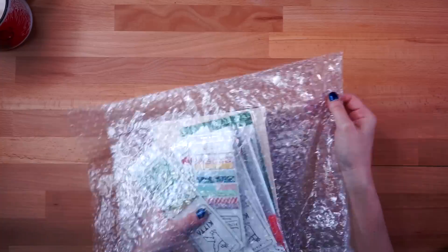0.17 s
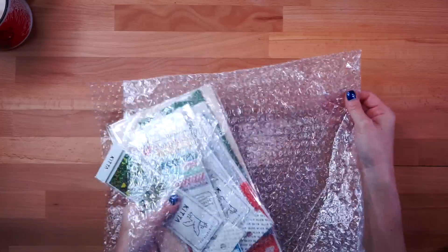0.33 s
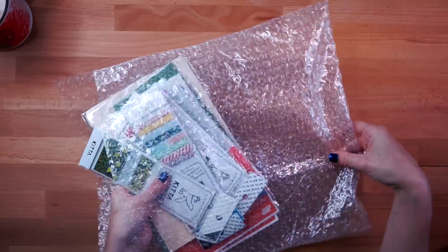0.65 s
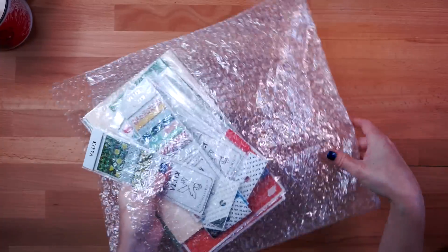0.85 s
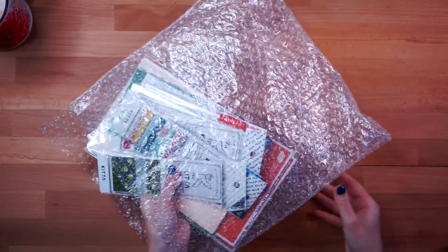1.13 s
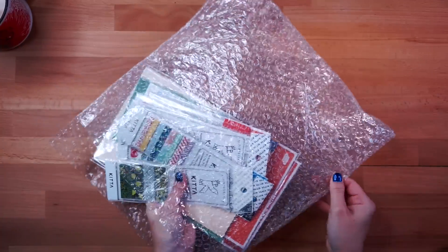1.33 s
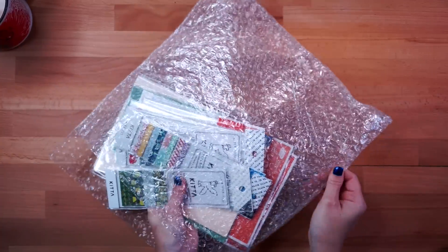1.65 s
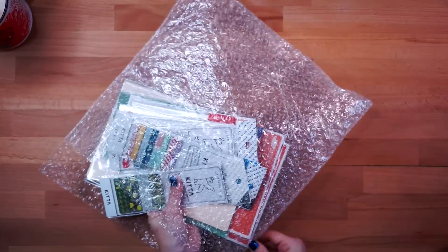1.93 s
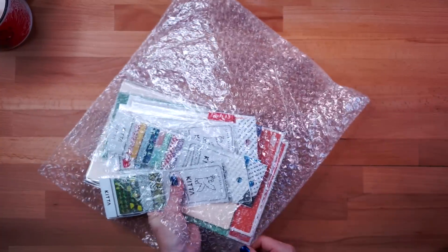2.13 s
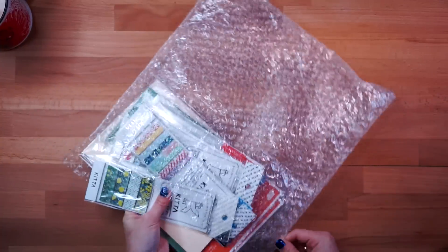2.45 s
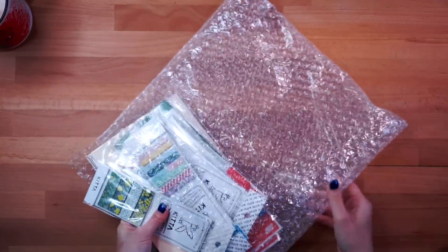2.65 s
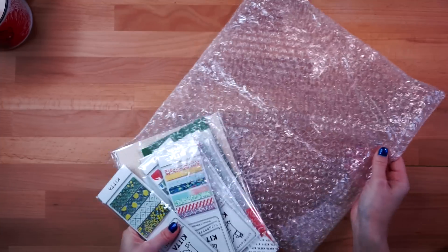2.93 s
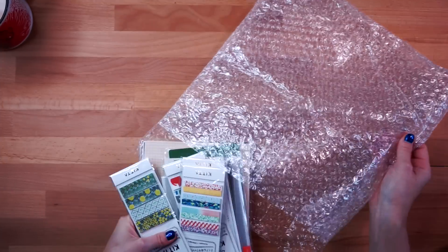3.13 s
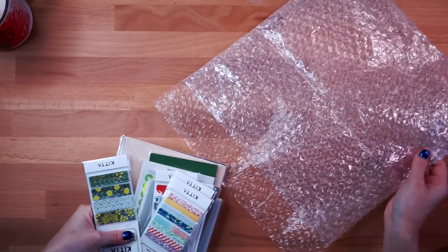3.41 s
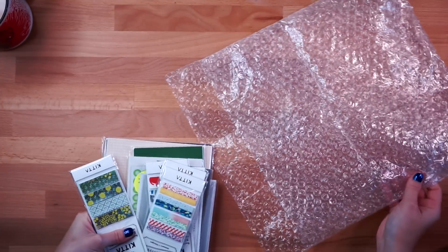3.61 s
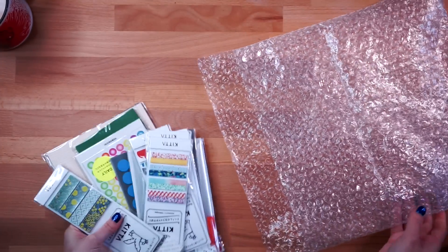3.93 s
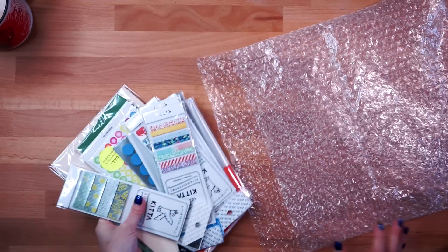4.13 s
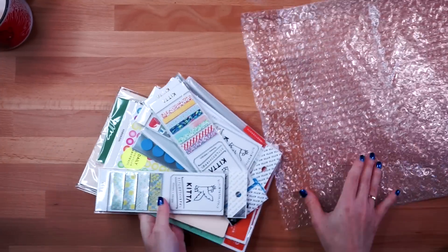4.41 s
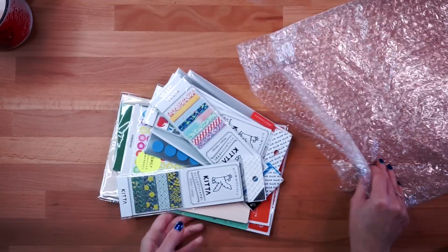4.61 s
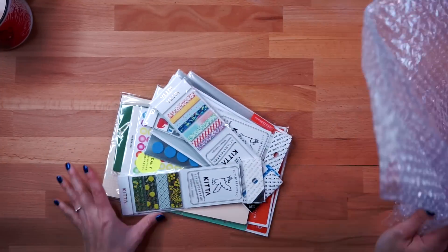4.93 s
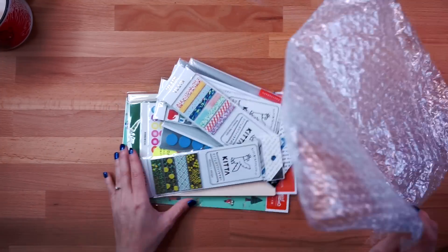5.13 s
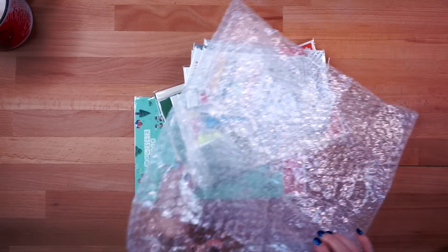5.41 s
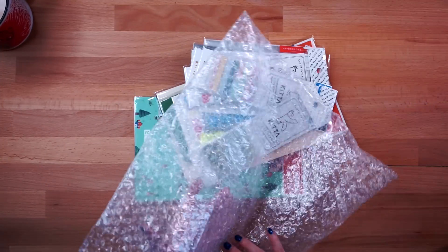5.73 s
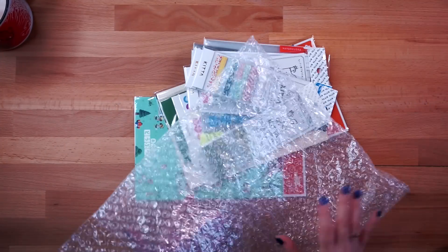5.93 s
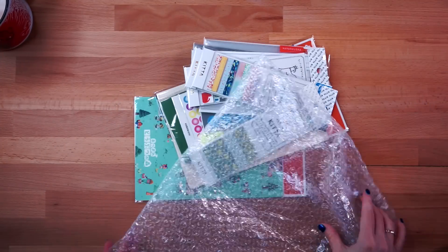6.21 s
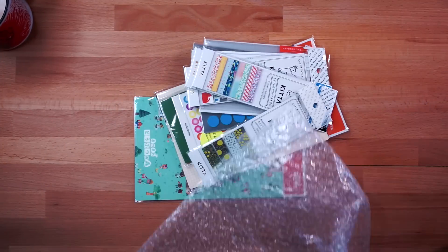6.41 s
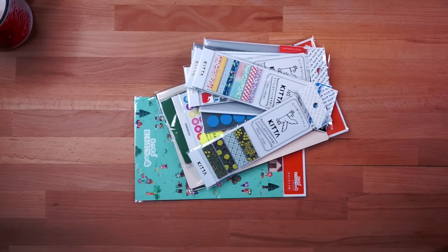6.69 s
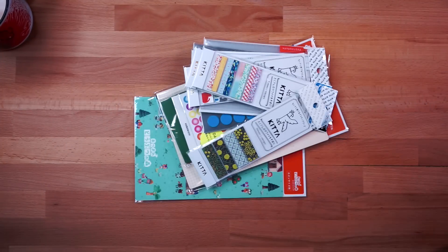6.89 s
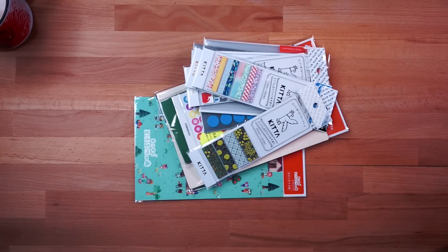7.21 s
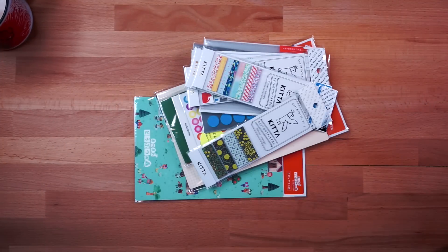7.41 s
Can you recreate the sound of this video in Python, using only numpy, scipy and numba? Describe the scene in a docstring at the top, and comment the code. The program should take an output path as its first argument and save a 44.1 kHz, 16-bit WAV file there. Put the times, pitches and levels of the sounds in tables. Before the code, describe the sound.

Hands pull a stack of plastic sleeves from a bubble-wrap bag on a wooden desk. Dense bright crackling with sharp snaps and low desk bumps comes first, eases into lighter crinkles, then surges again. Sleeves swish briefly, soft thuds follow, and the wrap drags off in a smoother rustle. Close microphone, small room, faint hiss.

```python
"""Hands pull a stack of plastic sleeves out of a bubble-wrap bag, lay it on a wooden desk and drag the bag away.
Throughout, the film buckles in countless short decaying sines of four sizes, some loud enough to snap alone.
Shoves make the desk top rumble as filtered noise; soft swings knock on it as the stack is laid down.
Then sleeves swish over each other as filtered clicks, more knocks follow, and dragging ends in a rustle.
A small room smears the film's sound by convolution; a deep building rumble and faint hiss lie under it all."""
import sys
import numpy as np
from scipy import signal
from scipy.fft import rfft, irfft
from scipy.io import wavfile
from scipy.ndimage import uniform_filter1d
from numba import njit

SR = 44100
rng = np.random.default_rng(int(sys.argv[2]) if len(sys.argv) > 2 else 0)


def generate_wav(signal):
    """Clip the signal to [-1, 1] and save it as 16-bit WAV at the path in sys.argv[1]."""
    frames = np.transpose(np.atleast_2d(signal))
    scaled = np.clip(frames, -1, 1) * 32767
    pcm = np.round(scaled).astype(np.int16)
    wavfile.write(sys.argv[1], SR, pcm)


N = 332955


def undb(db):
    """Level law: 20 dB is a factor of ten in amplitude."""
    return 10 ** (np.asarray(db) / 20)


def unit(x):
    """Normalisation to an RMS amplitude of 1."""
    return x / np.sqrt(np.mean(x ** 2))


def curves(table):
    """Linear interpolation: columns of a table joined by straight lines, one value a sample."""
    time_s, *columns = np.transpose(table)
    return [np.interp(np.arange(N) / SR, time_s, column) for column in columns]


def band(x, lo_hz, hi_hz, order=2):
    """Band-pass filtering with a Butterworth response."""
    edges_hz = [lo_hz, min(hi_hz, .45 * SR)]
    return signal.sosfilt(signal.butter(order, edges_hz, "bandpass", fs=SR, output="sos"), x)


def walk(rate_hz):
    """Random modulation: levels held for 1 / rate_hz and slewed from one to the next; spread 1."""
    hold = int(SR / rate_hz)
    steps = np.repeat(rng.standard_normal(N // 40), hold)[:N]
    slewed = uniform_filter1d(steps, hold)
    return slewed / slewed.std()


def swells(at, rise, hold, fall, levels_db, rest_db):
    """Incoherent summation: rows that rise, hold and fall add in power; one dB curve a column of levels."""
    t = np.arange(0, N + 64, 64)[:, None] / SR
    away = np.maximum(0, np.maximum((at - t) / rise, (t - at - hold) / fall))
    # one rise or fall time away from full strength is 20 dB down
    power = undb(-40 * away) @ undb(2 * levels_db) + undb(2 * rest_db)
    return [np.interp(np.arange(N) / SR, t[:, 0], curve) for curve in 10 * np.log10(power.T)]


# moves of the hands: full_strength_s, rise_s, hold_s, fall_s (rise and fall span 20 dB), crease_level_db,
# then relative to the creases: flexing_db, folds_db, ticks_db
HAND_MOVES = [(0.053, 0.26, .05, 0.23, -45.5, 5.5, 2, -2.5), (0.123, .05, .005, .1, -42, 0, 4, -5),
              (0.214, 0.18, 0.014, 0.19, -40, 7, 5, 0), (0.387, 0.35, 0.025, 0.13, -44.5, 3.5, 3.5, -1.5),
              (0.647, .12, 0.037, 0.22, -43, 4, -1.5, -1), (0.856, .04, .01, 0.28, -48.5, 4, -3, 1.5),
              (1.006, 0.032, 0.0087, 0.034, -43, 5.5, 0, -7), (1.279, 0.043, 0.12, 0.059, -46, 8, 0.5, -1),
              (1.485, .04, .005, .09, -49.5, 0, -4, -3), (1.556, .08, .005, 0.11, -52.5, 2.5, -4, -3),
              (1.63, 0.09, 0.037, .15, -54, -13, -17, 1.5), (1.728, 0.11, .005, 0.17, -50, 3, -16, -5),
              (1.836, 0.14, 0.028, .1, -58, 1.5, 3.5, -4), (1.945, 0.32, 0.043, 0.18, -63, -16, -3, -6),
              (2.099, 0.04, 0.0057, .2, -59.5, 4.5, 1, 2), (2.166, 0.094, .005, .08, -57.5, 5, -9, 3),
              (2.261, 0.054, 0.14, 0.2, -42.5, 3, -1.5, -.6), (2.822, 0.22, .005, 0.097, -41, 4, -2.5, -3),
              (2.996, 0.45, 0.26, 0.32, -50.5, 1.5, 2, -3), (3.36, 0.08, .005, 0.22, -53, -16, -10, 4),
              (3.5, 0.27, 0.19, 0.05, -57.5, -3, -1, 0), (3.736, 0.016, 0.004, 0.07, -49, 2.5, 0, 1),
              (3.873, 0.22, .005, .5, -46, -17, 2.5, -8), (4.173, 0.24, .005, 0.2, -50, 0, -1, -0.5),
              (4.32, 0.31, 0.062, .2, -56, -2, 1, -7), (4.558, 0.37, 0.091, 0.47, -44, -0.5, -5.5, -6),
              (4.784, 0.13, 0.12, .15, -48.5, 4, -1, -2), (4.96, .12, 0.039, .04, -50, 2, -4, -1.5),
              (5.018, .01, .013, .02, -46.5, -2, 2.5, -5), (5.093, .05, 0.084, 0.12, -64, 1, 6.5, -7),
              (5.245, 0.23, 0.22, 0.35, -59, -25, -11, -2), (5.32, .1, .005, .1, -66.5, 14.5, -5, 3),
              (5.507, 0.019, .005, 0.063, -44.5, 10.5, -1.5, 4),
              (5.559, 0.093, 0.21, 0.22, -47.5, 1.5, 1.5, -1),
              (5.864, 0.056, .005, 0.049, -47, 5.5, -2, -4),
              (5.927, 0.19, .03, 0.1, -45.5, -36, -10.5, -1.5),
              (6.079, .03, 0.024, 0.058, -39, 0.5, -4.5, -7), (6.176, 0.055, .005, 0.65, -48.5, -2.5, 0, 0),
              (6.338, 0.4, .005, 0.66, -43, -7.5, -2.5, -7.5),
              (6.577, 0.093, .14, 0.29, -38.5, -5.5, -2, -5), (6.796, .3, 0.043, 0.23, -45, 8.5, 2.5, -7),
              (7.009, .02, 0.051, 0.22, -45, 5.5, 0.5, -7), (7.16, 0.24, 0.036, 0.16, -55, 1, 3, -0.5),
              (7.306, .2, .005, 0.036, -62, 11.5, 9, -3), (7.347, 0.61, 0.026, 1, -55.5, -36, -10, -3)]
# the film settles between moves: creases_db, flexing_db, folds_db, ticks_db
SETTLING_DB = (-67.5, -90, -82, -72)


def handling():
    """Forced excitation: the hands set the crease level and, against it, flexing, folds and ticks, in dB."""
    moves = np.array(HAND_MOVES)
    levels_db = moves[:, 4:5] + np.c_[0 * moves[:, 0], moves[:, 5:]]
    crease, *others = swells(*moves[:, :4].T, levels_db, np.array(SETTLING_DB))
    return [crease] + [other - crease for other in others]


@njit
def rings(at, hz, cycles, size, length):
    """Damped free vibration: each buckle is a sine that dies by 1/e in a quarter of its cycles."""
    out = np.zeros(length)
    for g in range(len(at)):
        turn = np.exp((2j * np.pi - 4 / cycles) * hz[g] / SR)
        state = size[g] + 0j
        start = int(at[g] * SR)
        stop = int((at[g] + 1.5 * cycles / hz[g]) * SR) + 2
        for i in range(start, min(length, stop)):
            out[i] += state.imag
            state *= turn
    return out


# sizes of buckle, large to small (flexing, folds, creases, ticks):
# lowest_hz, highest_hz, ring_cycles, rate_per_s, size_scatter_db, level_db
BUCKLE_SIZES = [(443, 728, 3.06, 700, 2.5, -8), (1356, 1870, 2.33, 1700, 2.5, -6),
                (2455, 8300, 1.65, 5000, 2.5, -1.39), (6360, 12700, 2.12, 6000, 2, -2)]


def crinkle():
    """Poisson showers of buckles: jerks swell all sizes together, and each size also flickers alone."""
    crease, flex, fold, tick = handling()
    jerk_db = 0.82 * walk(28) + 0.7 * walk(170)
    out = 0
    for relative_db, buckle in zip((flex, fold, 0, tick), BUCKLE_SIZES):
        lo, hi, cycles, rate, scatter_db, level_db = buckle
        u = rng.random((60000, 4))
        at = np.cumsum(-np.log(1 - u[:, 0])) / rate
        keep = at < N / SR
        sign = np.sign(u[:, 1] - .5)
        size = sign * undb(-scatter_db * np.log(1 - u[:, 2]))
        hz = lo * (hi / lo) ** u[:, 3]
        shower = rings(at[keep], hz[keep], cycles, size[keep], N)
        # a buckle radiates little far below or above its own ring
        shower = unit(band(shower, 0.61 * lo, 1.27 * hi))
        flicker_db = 0.86 * walk(23)
        out = out + shower * undb(crease + relative_db + level_db + jerk_db + flicker_db)
    return out


# lone snaps: start_s, level_db (before the common snap gain), pitch_hz, slope_db_per_octave away from the pitch
LONE_SNAPS = [(.04, -30.5, 4500, 12), (.071, -33.5, 2500, 3), (.106, -22.5, 3000, 0.5), (.177, -35, 650, 4),
              (.2165, -18.5, 4000, 7), (.222, -33, 600, 5), (.249, -24.5, 1500, 10), (.264, -24, 1900, 4),
              (.346, -31, 900, 3), (.392, -29.5, 700, 6), (.563, -38.5, 6000, 7), (.66, -48, 1200, 1.2),
              (.705, -24.5, 1730, 14), (.758, -44, 4000, 1.6), (.79, -35, 4500, 6), (.856, -39.5, 700, 3),
              (.972, -33, 4500, 11), (.995, -41.5, 9000, 2), (1.015, -34, 2500, 6), (1.158, -39.5, 9000, 2),
              (1.269, -33.5, 560, 28), (1.282, -41, 900, 1.2), (1.301, -40, 560, 2),
              (1.332, -27.5, 9000, 8), (1.481, -27.5, 1870, 5.5), (1.512, -33.5, 9000, 9),
              (1.551, -36, 4500, 6), (1.595, -44, 2800, 4), (1.626, -21.5, 2000, 5),
              (1.853, -33.5, 6000, 6.5), (1.94, -50, 5000, 4), (1.967, -39.5, 9000, 8),
              (2.098, -46, 5000, 3.5), (2.164, -52, 560, 4), (2.209, -37, 9000, 14),
              (2.258, -32.5, 9000, 3), (2.274, -35, 600, 1.5), (2.285, -37, 5000, -1),
              (2.294, -33, 4500, 2.2), (2.345, -42, 8000, 6), (2.363, -40, 6000, 2), (2.621, -46, 3500, 11),
              (2.637, -39.5, 650, 7), (2.762, -38.5, 6000, 2), (2.801, -23.5, 4500, 4),
              (2.803, -34, 560, 8), (2.832, -37, 700, 1), (2.983, -42.5, 560, 0), (3.232, -26.5, 3200, 2),
              (3.273, -40, 1600, 2), (3.355, -23.5, 9000, 14), (3.509, -43.5, 7500, 3.5),
              (3.663, -30, 6950, 8.5), (3.737, -29, 6500, 6.5), (3.935, -28.5, 9000, 14),
              (4.174, -32, 4500, 12), (4.409, -43, 1500, 5), (4.445, -31, 5500, 10), (4.48, -34, 4500, 5),
              (4.628, -35.5, 3500, 3), (4.762, -45, 700, 1.5), (4.883, -38, 600, 3), (4.896, -39, 3200, 3),
              (4.984, -38, 597, 3), (5.016, -35.5, 2200, 1), (5.028, -29, 2000, 5),
              (5.047, -32.5, 800, 2.5), (5.105, -46, 554, 5), (5.118, -40, 2800, 4), (5.135, -42, 3500, 5),
              (5.163, -46.5, 890, 1), (5.507, -39, 1500, 3), (5.598, -40, 9000, 2.5),
              (5.783, -31.5, 3780, 8), (5.861, -44, 700, 1.2), (5.943, -45, 9000, 4),
              (6.063, -37.5, 2600, 0), (6.076, -39, 3200, 6), (6.251, -42, 3000, 4), (6.292, -40, 6000, 8),
              (6.479, -41, 560, 3), (6.515, -30.5, 9000, 4.5), (6.555, -36, 4000, 9), (6.676, -29, 2000, 6),
              (6.811, -28, 700, 3), (6.874, -29.5, 556, 9), (6.959, -39, 2800, 7.5), (7.004, -30, 900, 4)]


def lone_snaps():
    """Spectral envelope: each buckle size is weighted by the octaves between its ring and the snap's pitch."""
    at, level_db, pitch_hz, slope = np.transpose(LONE_SNAPS)
    middle_hz = np.sqrt([lo * hi for lo, hi, *_ in BUCKLE_SIZES])
    octaves = abs(np.log2(middle_hz / pitch_hz[:, None]))
    return np.c_[at, level_db, -slope[:, None] * octaves]


# small snaps: rate_per_s, size_range_db (either way), colour_scatter_db
SMALL_SNAP_STATISTICS = (70, 4.4, 1.3)
# crumpling snaps, dragging only rustles: time_s, small_snaps_over_creases_db (before the common snap gain)
CRUMPLING = [(0, 5.5), (1.0, 5), (2.2, 4.5), (3.0, 3.5), (3.75, 2.5), (3.85, 2), (4.3, -3.5), (4.5, 2.5),
             (5.9, 2), (6.15, -2.5), (6.6, -3.5), (7.55, -11)]


def small_snaps():
    """Poisson process: random small snaps, their level and colour led by the handling of the moment."""
    rate, size_range_db, colour_db = SMALL_SNAP_STATISTICS
    u = rng.random((2000, 2))
    v = rng.standard_normal((2000, 4))
    at = np.cumsum(-np.log(1 - u[:, 0])) / rate
    keep = at < N / SR
    moment = (at[keep] * SR).astype(int)
    controls = handling() + curves(CRUMPLING)
    crease, flex, fold, tick, over = (control[moment] for control in controls)
    level_db = crease + over + size_range_db * (2 * u[keep, 1] - 1)
    colours = np.c_[flex - 3.0, fold, 0 * fold, tick] + colour_db * np.tanh(v[keep])
    return np.c_[at[keep], level_db, colours]


SNAP_SPREAD_S, SNAP_GAIN_DB = .0008, 4  # mean scale of the random delays; gain common to all snaps


def snaps(table, count=5):
    """Avalanche: buckles of every size let go within a millisecond or two, the first ones strongest."""
    out = 0
    for k, (lo, hi, cycles, *_) in enumerate(BUCKLE_SIZES):
        u = rng.random((len(table), count, 2))
        late = -np.log(1 - u[..., 0])
        late -= late.min(axis=1, keepdims=True)
        size = undb(table[:, 1, None] + table[:, 2 + k, None] + SNAP_GAIN_DB) * np.exp(-.6 * late)
        # short rings need a higher peak to carry the same energy
        size = size * (-1) ** np.arange(count) * np.sqrt(lo / BUCKLE_SIZES[0][0])
        hz = lo * (hi / lo) ** ((np.arange(count) + u[..., 1]) / count)
        at = table[:, :1] + SNAP_SPREAD_S * late
        burst = rings(at.ravel(), hz.ravel(), 0.8 * cycles, size.ravel(), N)
        out = out + band(burst, 0.93 * lo, 1.23 * hi)
    return out


# sleeves slide over each other: time_s, level_db (before random wavering)
SLEEVE_SLIDE = [(3.78, -83), (3.86, -49), (3.95, -46), (4.1, -45.5), (4.19, -53), (4.3, -83)]
# air pockets between the sleeves: centre_hz, width_hz, relative_level_db
AIR_POCKETS = [(1540, 550, -20), (2020, 490, 3), (3750, 640, -4), (5160, 1700, 4), (7100, 990, -24)]


def slide():
    """Stick-slip friction: dense clicks, coloured by the resonance of the pockets of air."""
    clicks = rng.standard_normal(N) * undb(2.8 * rng.standard_normal(N))
    swish = 0
    for hz, width_hz, db in AIR_POCKETS:
        pocket = band(clicks, hz - width_hz / 2, hz + width_hz / 2, order=1)
        swish = swish + undb(db) * unit(pocket)
    return unit(swish) * undb(curves(SLEEVE_SLIDE)[0] + 1.4 * walk(30))


# close echoes off desk, stand and near walls: nominal_delay_s, level_db (both relative to the direct sound)
CLOSE_ECHOES = [(.0011, -9), (.0025, -8), (.0082, -10), (0.015, -26)]
# decay of the room's tail by band: centre_hz, t60_s, relative_level_db
ROOM_DECAY = [(480, 0.25, -5), (1730, 0.43, -5), (5960, 0.36, -0.5), (13000, 0.12, 1.5)]
ROOM_DB = -6.5  # energy of the tail against the direct sound


def room(x, size=1024):
    """Reverberation by convolution: direct sound, close echoes and a tail with its own decay in each band."""
    span, count = 16 * size, N // size + 2
    t = np.arange(span - 2 * size) / SR
    # the film moves, so each moment has new paths
    noise = rng.standard_normal((count, len(t)))
    paths = 0
    for hz, t60, db in ROOM_DECAY:
        paths = paths + band(noise, hz / 2, hz * 1.6, order=1) * undb(db - 60 * t / t60)
    paths *= np.clip(t / 0.019, 0, 1)
    paths *= undb(ROOM_DB) / np.sqrt(np.mean(np.sum(paths ** 2, axis=1)))
    paths[:, 0] = 1
    for delay_s, db in CLOSE_ECHOES:
        delay = (delay_s * SR * rng.uniform(.7, 1.3, count)).astype(int)
        paths[np.arange(count), delay] += undb(db)
    # overlapping windowed pieces, each convolved with the paths of its moment
    padded = np.r_[np.zeros(size), x, np.zeros(3 * size)]
    index = size * np.arange(count)[:, None] + np.arange(2 * size)
    pieces = padded[index] * signal.windows.hann(2 * size, sym=False)
    wet = irfft(rfft(pieces, span) * rfft(paths, span), span)
    out = np.zeros(size * count + span)
    for k, piece in enumerate(wet):
        out[k * size:k * size + span] += piece
    return out[size:size + N] / np.sqrt(np.mean(np.sum(paths ** 2, axis=1)))


# shoves that shake the desk: full_strength_s, fall_s (over 20 dB), deep_level_db, upper_bass_level_db;
# a negative fall_s swaps rise and fall, a zero adds nothing audible
DESK_SHOVES = [(.1, 0.08, -37.5, -53), (.25, 0.23, -43, -51), (.45, 0.3, -57, -73),
               (.685, 0.05, -37.5, -52.5), (.88, -0.4, -69, -67), (.96, 1.7, -71, -79),
               (1.025, 0.2, -76, -71), (1.11, 0.6, -65, -88), (1.38, 0.07, -44, -49.5),
               (1.73, 0.5, -74, -78), (2.1, -0.1, -62, -71), (2.31, 0.06, -56, -61), (2.5, 0, -66, -61),
               (2.81, 0.07, -63, -60), (3.09, 0.03, -52, -90), (3.2, 0.42, -53, -80),
               (3.33, 0.14, -61, -86), (3.75, 0.4, -74, -79), (3.82, 0.3, -62, -80), (4.08, -0.4, -72, -92),
               (4.56, 0.64, -71, -70), (4.85, .3, -71, -62), (5.36, 0.47, -59.5, -74),
               (5.47, -0.04, -43, -71), (5.54, 0.01, -37, -46.5), (5.69, 0.13, -41, -47),
               (5.89, 0, -58, -82), (6.1, 0.08, -43, -56), (6.2, -0.4, -61, -66), (6.33, .08, -61, -63),
               (6.57, 0.13, -50, -53), (6.67, 0.11, -47, -42), (6.81, 0.18, -43.5, -41),
               (7.03, -0.03, -47, -50), (7.3, 0, -70, -70), (7.5, -1.6, -72.5, -88)]
SHOVE_RISE = 0.79  # rise time as a share of fall_s
# rubbing of the desk against the flexing film: deep_db, upper_bass_db
RUBBING_DB = (-26.5, -26.5)


def rumble():
    """Structure-borne sound: shoves and rubbing shake the desk top, as two bands of wavering noise."""
    at, fall, *levels = np.transpose(DESK_SHOVES)
    crease, flex, *_ = handling()
    shoves = swells(at, SHOVE_RISE * fall, 0, fall, np.transpose(levels), -99)
    deep_gain, upper_gain = (np.hypot(undb(shove), undb(crease + flex + db))
                             for shove, db in zip(shoves, RUBBING_DB))
    deep = unit(band(rng.standard_normal(N), 11.0, 81, order=3))
    upper = unit(band(rng.standard_normal(N), 82, 402, order=3))
    return undb(0.5 * walk(14)) * (deep_gain * deep + upper_gain * upper)


# knocks on the desk: middle_s, level_db, pitch_hz, length_s (to 1/e either side), first_swing (1 up, -1 down)
DESK_KNOCKS = [(3.159, -31, 42, .013, -1), (5.507, -23, 72, .012, 1), (5.704, -36, 75, .012, 1)]


def thuds():
    """Heavily damped response to impact: a knock is one or two soft swings under a bell-shaped envelope."""
    t = np.arange(N) / SR
    out = np.zeros(N)
    for middle_s, db, hz, length_s, way in DESK_KNOCKS:
        after = t - middle_s
        out -= way * undb(db) * np.sin(2 * np.pi * hz * after) * np.exp(-(after / length_s) ** 2)
    return out


# steady deep rumble of the building: lowest_hz, highest_hz, level_db
BUILDING_RUMBLE = (25, 34.5, -69.5)


def building():
    """Stationary band-limited noise: the deep rumble of the building."""
    lo, hi, level_db = BUILDING_RUMBLE
    return undb(level_db) * unit(band(rng.standard_normal(N), lo, hi))


FILM_LOW_HZ = 316  # the film's sound is cut off steeply below this


def scene():
    """Superposition: film heard through the room, desk and building straight into the microphone."""
    film = crinkle() + slide() + snaps(np.r_[lone_snaps(), small_snaps()])
    film = signal.sosfilt(signal.butter(6, FILM_LOW_HZ, "highpass", fs=SR, output="sos"), film)
    return (room(film) + rumble() + thuds() + building())[None]


HISS_DB, TOP_HZ = -83, 15750  # hiss level before the cut; edge of the cut


def record(dry):
    """Noise floor and band limit: faint amplifier hiss and a steep cut at the top."""
    hiss = undb(HISS_DB) * rng.standard_normal(dry.shape)
    return signal.sosfilt(signal.ellip(10, .2, 80, TOP_HZ, fs=SR, output="sos"), dry + hiss)


dry = scene()
out = record(dry)
generate_wav(out)
```